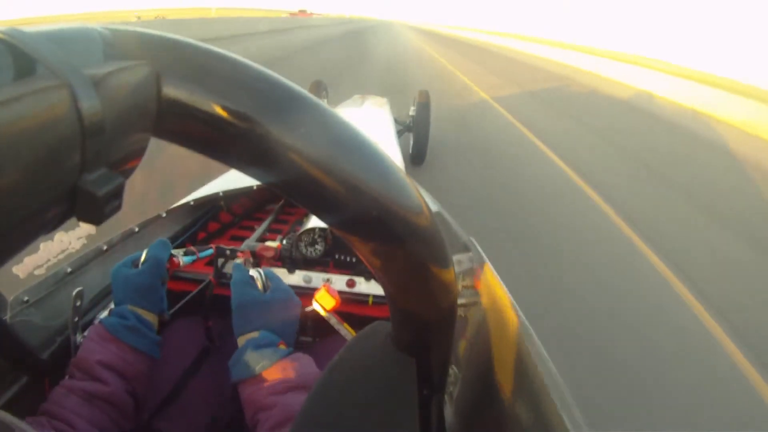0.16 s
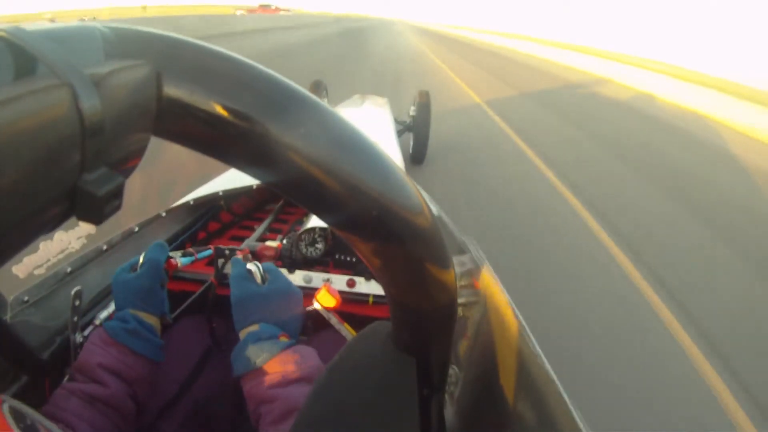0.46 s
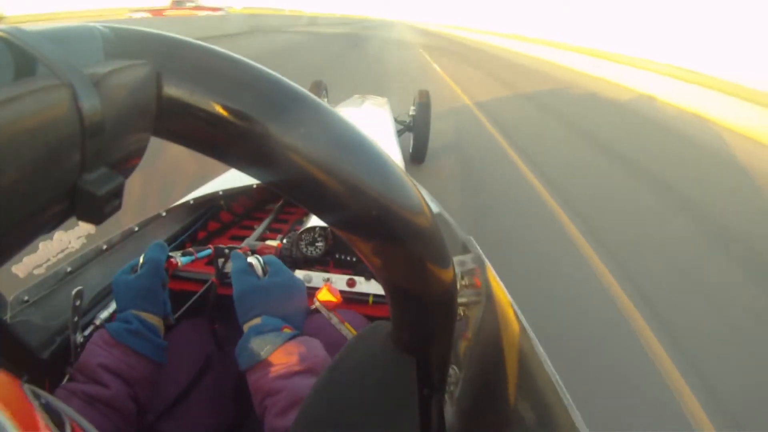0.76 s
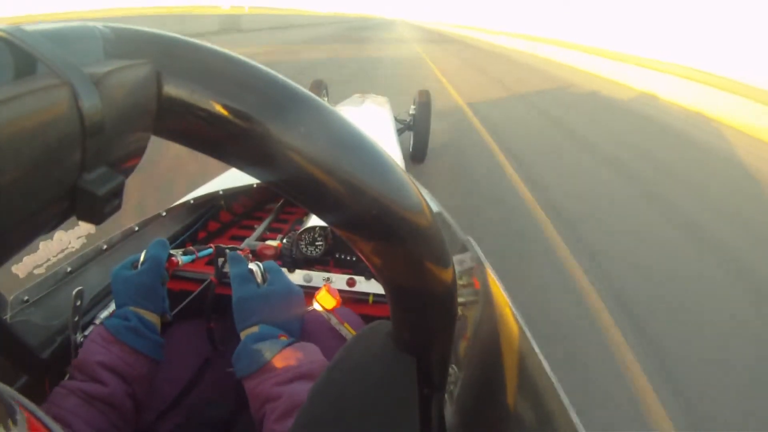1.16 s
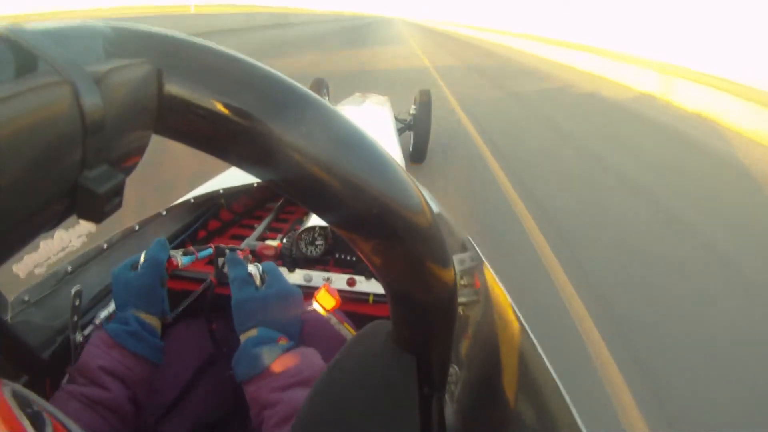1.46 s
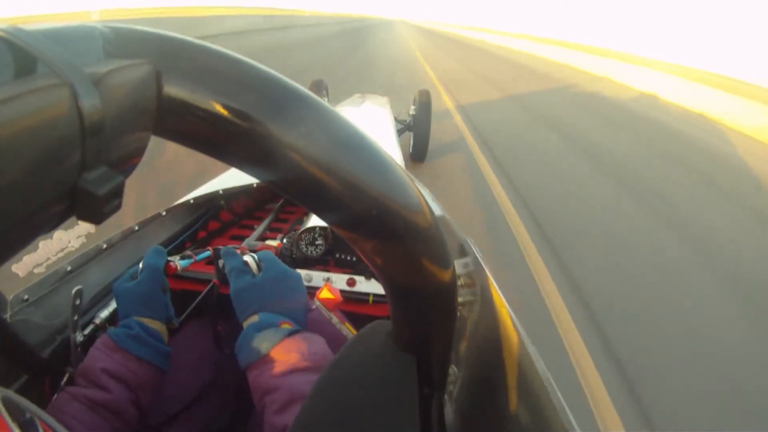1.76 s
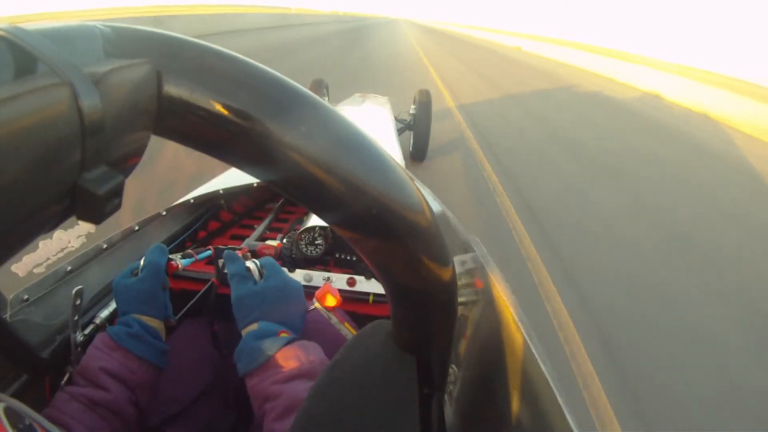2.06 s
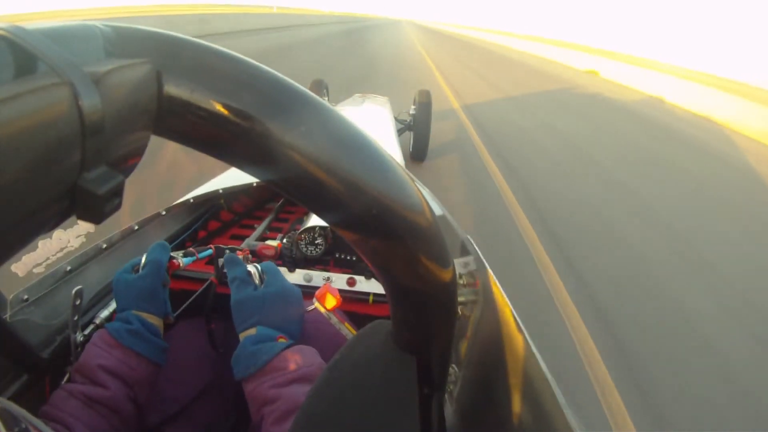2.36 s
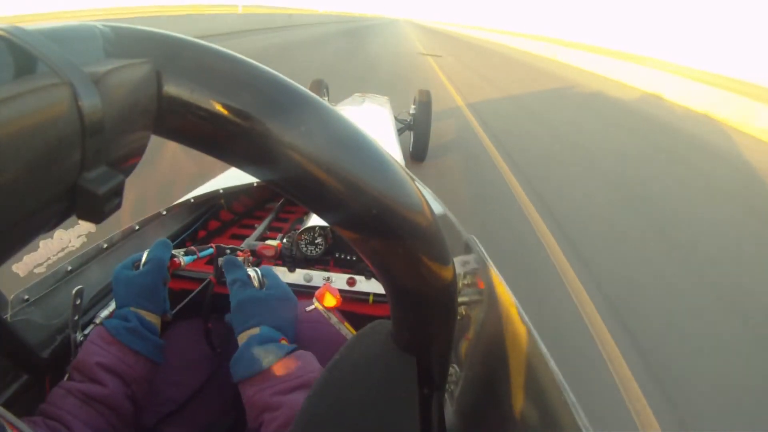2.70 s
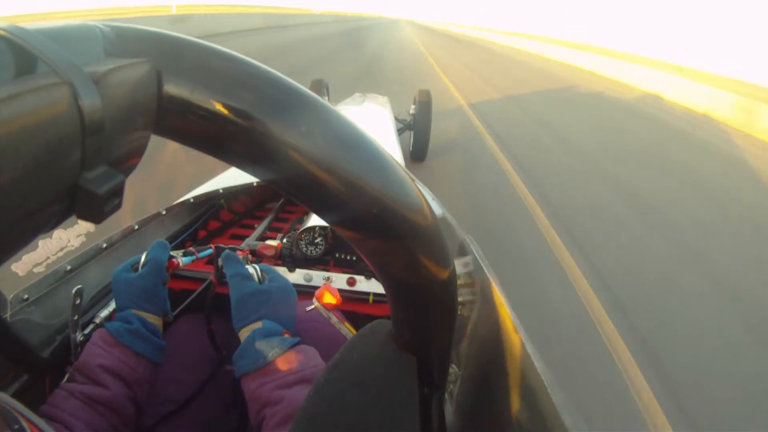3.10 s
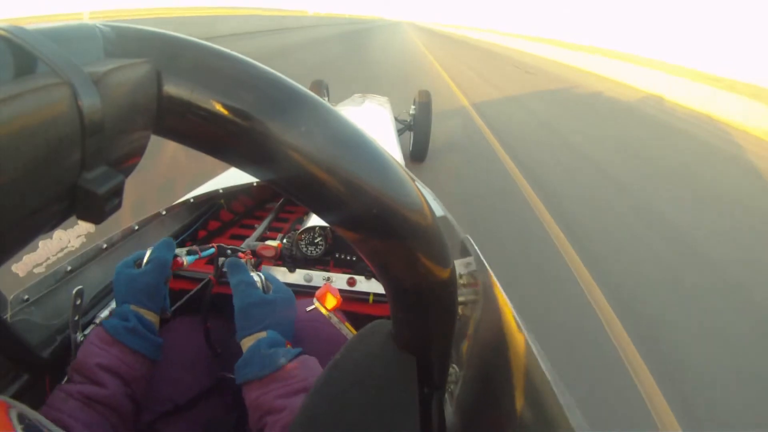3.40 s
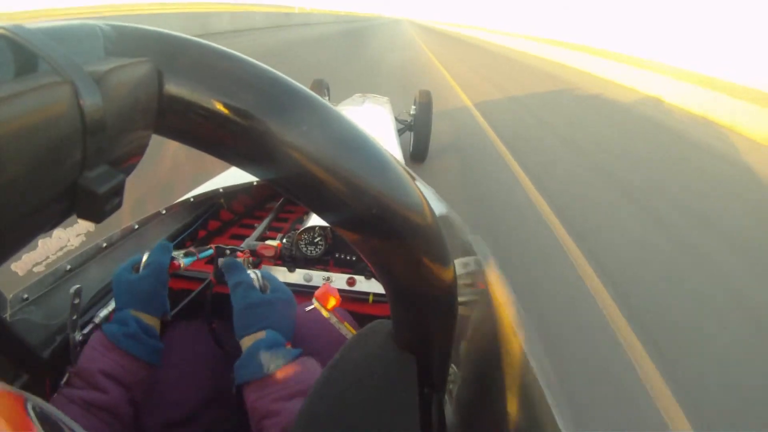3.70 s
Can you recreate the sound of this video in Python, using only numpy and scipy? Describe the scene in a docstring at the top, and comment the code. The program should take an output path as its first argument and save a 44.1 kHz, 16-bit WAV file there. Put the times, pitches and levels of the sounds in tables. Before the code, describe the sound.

A jet dragster's loud roar fades as its turbine whines down under heavy wind buffeting

```python
"""A jet dragster coasts down the strip, heard by a small camera in the open cockpit.
Roar, air rush and intake hiss, all coloured noise, start strong; the turbine spools down, its first blade row
whining ever lower, while wind buffeting and slow swells of noise push the microphone into overload.
Past two seconds the higher blade rows' tones come forward; near the end the chassis thumps twice, short damped sines.
Throughout, the camera keeps few samples a second and holds each, so the treble is a mirror of the rest."""
import sys
import numpy as np
from scipy import signal
from scipy.fft import rfft, irfft, next_fast_len
from scipy.io import wavfile
from scipy.ndimage import uniform_filter1d

SR = 44100
rng = np.random.default_rng(int(sys.argv[2]) if len(sys.argv) > 2 else 0)


def put_to_file(sound):
    """Save the sound as 16-bit audio at rate SR, in the file named by the first command-line argument."""
    columns = np.atleast_2d(sound).T  # one column per channel
    safe = np.clip(columns, -1, 1)
    whole_steps = np.round(safe * 32767)
    wavfile.write(sys.argv[1], SR, whole_steps.astype(np.int16))


N = 169785
CAMERA_SR = 12000  # samples a second kept by the camera


def amp(db):
    """dB to gain."""
    return 10 ** (np.asarray(db) / 20)


def rms_one(x):
    """Scale to rms 1."""
    return x / np.sqrt(np.mean(x ** 2) + 1e-20)


def in_time(rows):
    """Columns of a table, after its time column, as curves over all samples."""
    times, *columns = np.transpose(rows)
    return [np.interp(np.arange(N) / SR, times, column) for column in columns]


def drift(corner_hz):
    """Random wandering of rms 1: noise through two equal one-pole lowpasses, drawn every 20 samples."""
    pole = np.exp(-2 * np.pi * corner_hz * 20 / SR)
    noise = rng.standard_normal(N // 20 + 2002)
    slow = signal.lfilter([1], [1, -2 * pole, pole ** 2], noise)[2000:]  # drop the filter's start
    return np.interp(np.arange(N) / 20, np.arange(len(slow)), rms_one(slow))


def turbulence(spectrum, gust_db, gust_hz, flicker_db):
    """Noise of a given colour in half-octave slices that gust together and flicker alone; rms 1."""
    hz, db = np.transpose(spectrum)
    size = next_fast_len(N)
    bin_hz = np.maximum(np.arange(size // 2 + 1) * SR / size, 1)
    colour_db = np.interp(np.log(bin_hz), np.log(hz), db, left=-80, right=-80)
    shaped = rfft(rng.standard_normal(size)) * amp(colour_db)
    place = 2 * np.log2(bin_hz)  # position in half octaves
    first, last = int(2 * np.log2(hz[0])) - 1, int(2 * np.log2(hz[-1])) + 2
    out = 0
    for k in range(first, last + 1):
        overlap = np.clip(1 - abs(place - k), 0, 1)  # triangular slices sum to one
        band = irfft(shaped * overlap, size)[:N]
        out = out + band * amp(flicker_db * drift(4))
    return rms_one(out * amp(gust_db * drift(gust_hz)))


def slowed(x):
    """The wind's pattern sinks in pitch as the car loses speed and eddies pass ever more slowly."""
    slowing = .11  # decay rate of speed [1/s]
    speed = np.exp(-slowing * np.arange(N) / SR)
    return np.interp(np.cumsum(speed), np.arange(N), x)


def wind_buffeting():
    """Eddies batter the microphone: low noise in quick gusts, slowing with the car."""
    # Colour of the buffeting: (frequency [Hz], level per Hz [dB])
    buffet_colour = [(50, -23), (85, -3.5), (125, 0.5), (160, -4), (210, -9), (300, -13.5), (450, -32)]
    return slowed(turbulence(buffet_colour, gust_db=1.0, gust_hz=12, flicker_db=0.93))


def wind_swell():
    """Slow buffeting of the wind: very low bass noise in slow gusts."""
    # Colour of the slow buffeting: (frequency [Hz], level per Hz [dB])
    swell_colour = [(12, 0.5), (25, -2), (45, -5.5), (70, -9), (110, -11), (150, -24)]
    return turbulence(swell_colour, gust_db=1.6, gust_hz=1, flicker_db=1.8)


def low_roar():
    """Low-mid noise, roughened by very fast gusts."""
    # Colour of the roar: (frequency [Hz], level per Hz [dB])
    roar_colour = [(80, -12), (150, 1.5), (250, 2), (400, -1.5), (620, -5), (800, -14.5), (1100, -20.5),
                   (1600, -27.5)]
    return turbulence(roar_colour, gust_db=1.5, gust_hz=75, flicker_db=0.88)


def blade_whine():
    """Each blade row sings a thin fluttering tone, the first two in a halo of noise, sinking with the spool."""
    # First blade row passing: (time [s], frequency [Hz])
    spool = [(0, 6130), (.1, 5950), (.35, 5540), (.72, 5110), (1.15, 4810), (1.45, 4565), (1.95, 4130),
             (2.5, 3730), (2.83, 3540), (3.3, 3287), (3.85, 3042)]
    # Blade rows: multiple of the first row's pitch [ratio]
    row_ratios = [1, 1.452, 1.772]
    # Tones and halos: (time [s], first row level [dB], second row level [dB], third row level [dB],
    #                   first halo level [dB], second halo level [dB])
    whine_levels = [(0, -48, -60, -60, -56, -60), (.17, -27, -60, -60, -44, -60),
                    (.4, -44, -60, -60, -34, -60), (.68, -39, -60, -60, -35, -60),
                    (.85, -41, -60, -60, -36, -60), (1.2, -48, -60, -60, -34, -60),
                    (1.45, -41, -60, -60, -34.5, -60), (1.85, -35, -60, -60, -48, -60),
                    (1.97, -46, -58, -60, -40, -60), (2.05, -54, -48, -49, -38, -51),
                    (2.5, -56, -49, -60, -42, -49), (2.75, -57, -41, -60, -44, -41),
                    (2.88, -46, -42, -62, -45, -48), (3.1, -43, -45, -62, -39.5, -40),
                    (3.4, -45, -48, -47, -39, -51), (3.65, -35, -41.5, -46, -39, -42),
                    (3.85, -60, -43, -44, -61, -39)]
    wander_hz, flutter_db, halo_hz = 13, 1.5, 220  # rms pitch wander, rms level flutter, halo noise corner

    first_row_hz, = in_time(spool)
    levels = in_time(whine_levels)
    out = 0
    for row, ratio in enumerate(row_ratios):
        row_hz = ratio * first_row_hz + wander_hz * drift(36)
        phase = 2 * np.pi * np.cumsum(row_hz) / SR
        tone_db = levels[row] + flutter_db * drift(6)
        out = out + np.sqrt(2) * amp(tone_db) * np.sin(phase)  # root two: level is rms
        if row < 2:
            # Random in-phase and quadrature parts spread noise to both sides of the tone
            halo = drift(halo_hz) * np.sin(phase) + drift(halo_hz) * np.cos(phase)
            out = out + amp(levels[3 + row]) * halo
    return out


def chassis_thumps():
    """The chassis swings about twice at full strength for each thump, then is quickly damped."""
    # Thumps through the chassis: (time [s], peak level [dB])
    thump_hits = [(2.856, -5), (3.321, -12.5)]
    ring_hz, hold_s, t60_s = 540, .0035, .006  # pitch, undamped time, time to fall 60 dB
    out, t = np.zeros(N), np.arange(2000) / SR
    fall_db = 60 * np.maximum(t - hold_s, 0) / t60_s
    for start_s, peak_db in thump_hits:
        start = int(start_s * SR)
        out[start:start + len(t)] += amp(peak_db - fall_db) * np.sin(2 * np.pi * ring_hz * t)
    return out


def intake_hiss():
    """Air drawn into the turbine: treble noise whose bands flicker separately."""
    # Colour of the intake hiss: (frequency [Hz], level per Hz [dB])
    hiss_colour = [(1500, -12), (2000, -7.5), (2400, -5.5), (3000, -2), (3400, -7.5), (3800, -10.5),
                   (4500, -9.5), (5200, -9.5), (5700, -26), (6300, -16)]
    return turbulence(hiss_colour, gust_db=0.0, gust_hz=37, flicker_db=1.9)


def air_rush():
    """Broad mid and treble noise of passing air, in fast gusts."""
    # Colour of the air rush: (frequency [Hz], level per Hz [dB])
    rush_colour = [(600, -14), (900, -8.5), (1300, -2), (1900, -6.5), (3500, -10), (5500, -12), (6300, -11)]
    return turbulence(rush_colour, gust_db=2.5, gust_hz=45, flicker_db=0.8)


def scene():
    """Wind, roar, whine, thumps, hiss and rush added up at the microphone."""
    # Rms levels along the run: (time [s], slow buffeting level [dB], buffeting level [dB],
    #                            roar level [dB], air rush level [dB], intake hiss level [dB])
    run_levels = [(0, -25, -18, -12.5, -21.5, -26), (.3, -18.5, -14, -12, -27.5, -28),
                  (.7, -15.5, -14.5, -13.5, -30.5, -27), (1.2, -12, -13.5, -15, -33.5, -29),
                  (1.7, -12.5, -12.5, -17, -38, -30.5), (2.05, -8.5, -12.5, -19.5, -35, -32),
                  (2.4, -17.5, -14, -19.5, -43, -32), (2.75, -11.5, -13.5, -20.5, -39, -33.5),
                  (3.1, -14.5, -13.5, -19, -53, -30.5), (3.45, -16, -13, -18.5, -64, -30.5),
                  (3.85, -13, -13, -23, -58, -35)]
    swell_db, buffet_db, roar_db, rush_db, hiss_db = in_time(run_levels)
    wind = amp(buffet_db) * wind_buffeting() + amp(swell_db) * wind_swell()
    roar = amp(roar_db) * low_roar()
    hiss = amp(hiss_db) * intake_hiss()
    rush = amp(rush_db) * air_rush()
    return (wind + roar + blade_whine() + chassis_thumps() + hiss + rush)[None]


def overload(x):
    """The microphone stage squashes peaks towards a ceiling, while a share leaks past unsquashed."""
    ceiling, knee, leak = 0.4, 1.71, 0.23  # amplitude, sharpness of the bend, share
    return x / (1 + abs(x / ceiling) ** knee) ** (1 / knee) + leak * x


def leveller(x):
    """The camera's gain control evens out the loudness, removing part of each swing from its aim."""
    window_s, share, aim_db = 0.029, 0.27, -15  # averaging time, share of swing removed, level aimed at
    power = uniform_filter1d(x ** 2, int(window_s * CAMERA_SR))
    level_db = 10 * np.log10(np.maximum(power, 1e-6))
    return x * amp(share * (aim_db - level_db))


def record(dry):
    """Sampled 12000 times a second, overloaded, bass drained twice, levelled, each sample held four steps."""
    anti_alias = signal.butter(6, 5590, fs=SR, output="sos")
    x = signal.sosfilt(anti_alias, dry[0])
    x = overload(signal.resample_poly(x, 40, 147))  # 44100 to 12000 a second
    for cut_hz in (61, 48):
        bass_cut = signal.butter(1, cut_hz, "high", fs=CAMERA_SR, output="sos")
        x = signal.sosfilt(bass_cut, x)
    x = amp(0.5) * leveller(x)  # 0.5 dB of output gain
    held = np.repeat(x, 4)  # steps at 48000 a second mirror the sound above 6 kHz
    held = signal.resample_poly(held, 147, 160)[:N]
    held = np.pad(held, (0, N - len(held)))
    treble_cut = signal.ellip(14, .5, 60, 15300, fs=SR, output="sos")  # ripple, stop [dB], edge [Hz]
    return signal.sosfilt(treble_cut, held)[None]


dry = scene()
out = record(dry)
put_to_file(out)
```